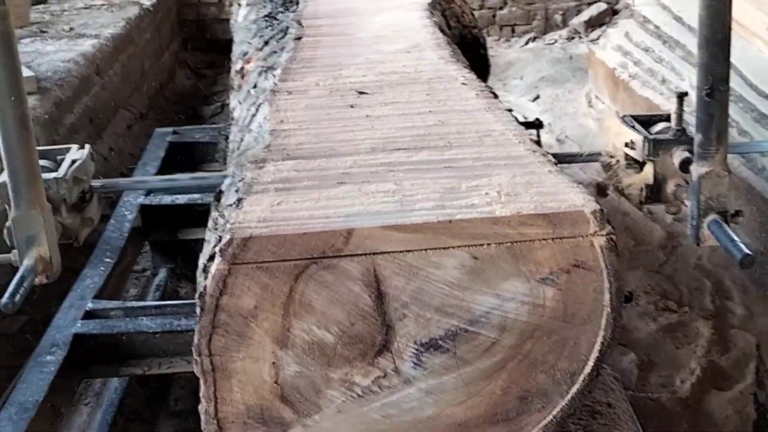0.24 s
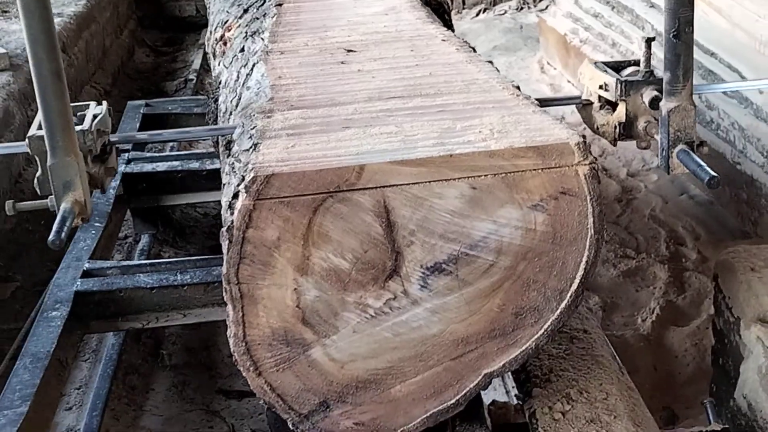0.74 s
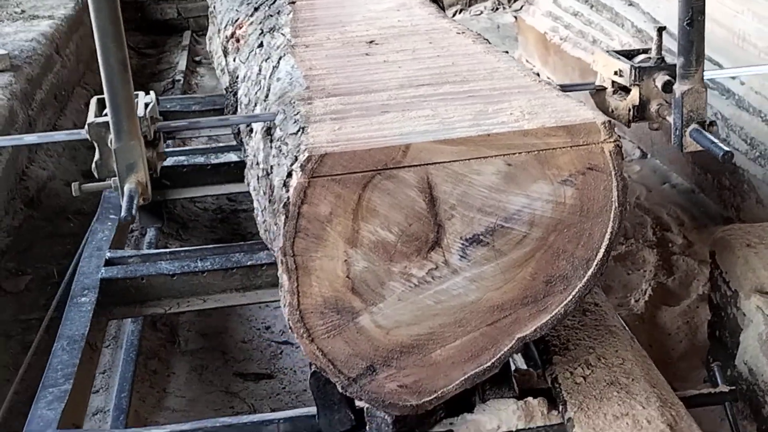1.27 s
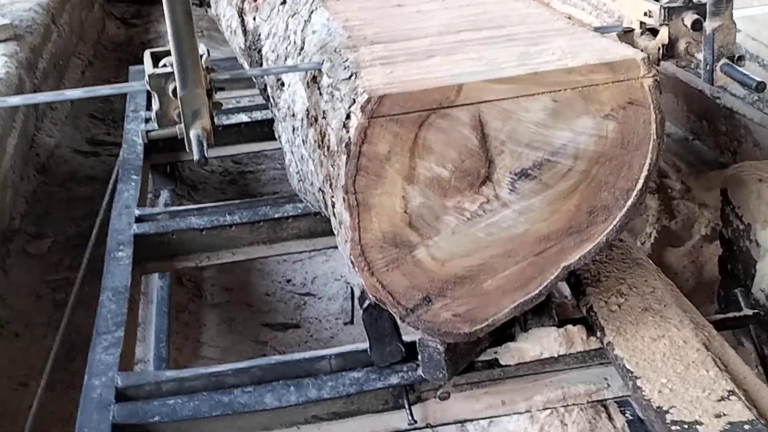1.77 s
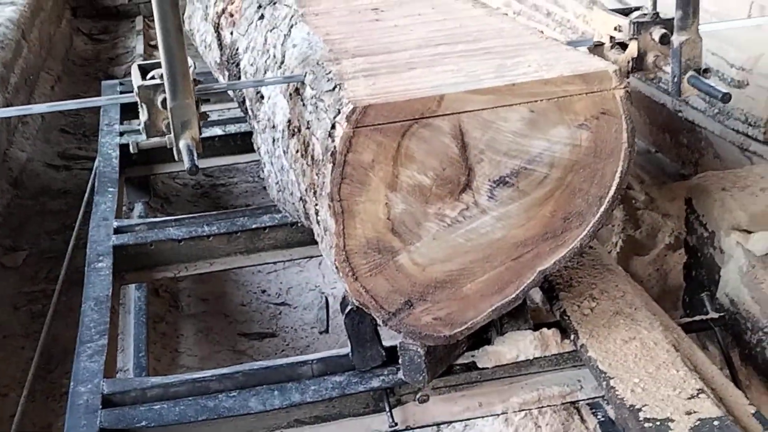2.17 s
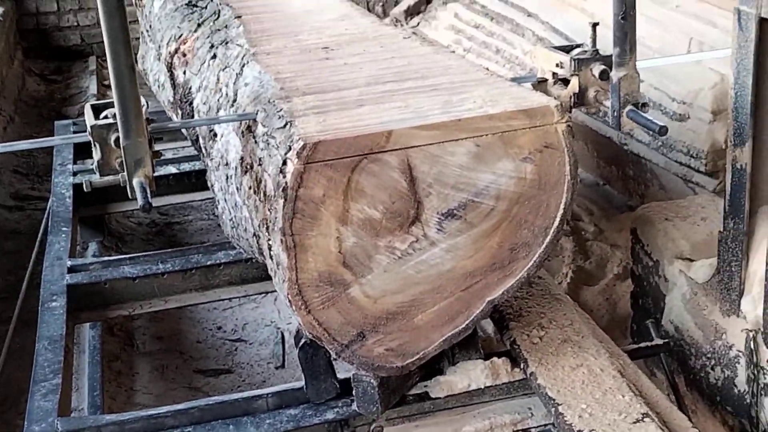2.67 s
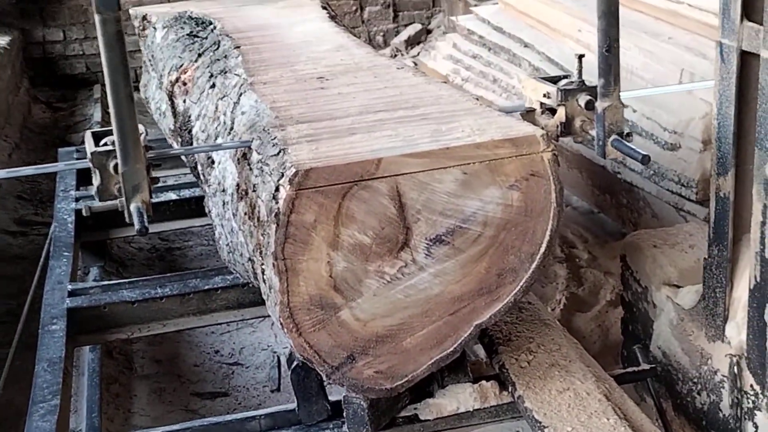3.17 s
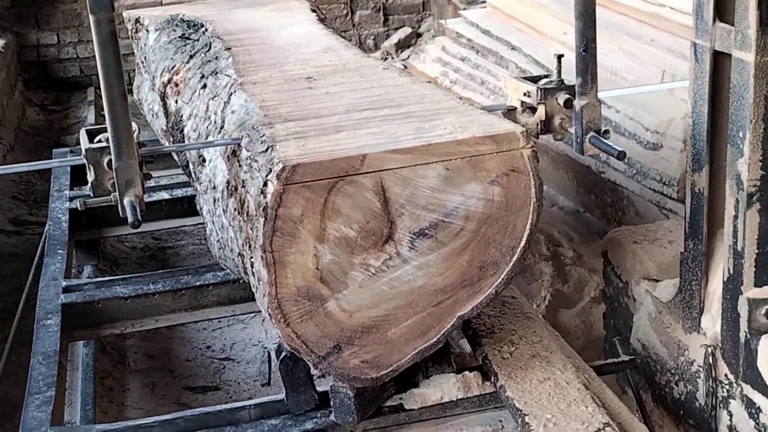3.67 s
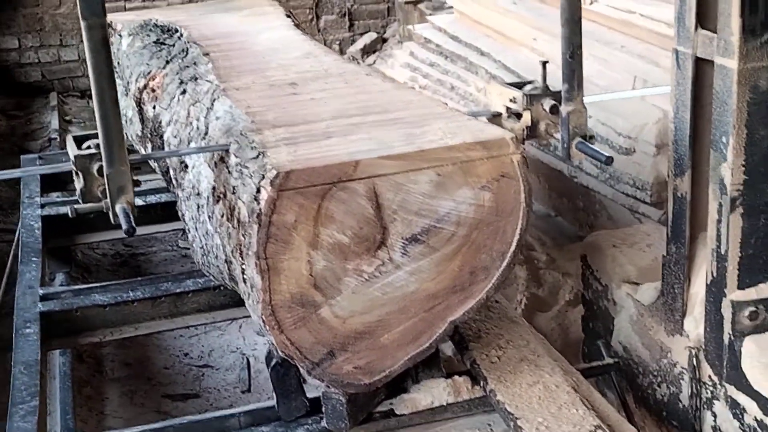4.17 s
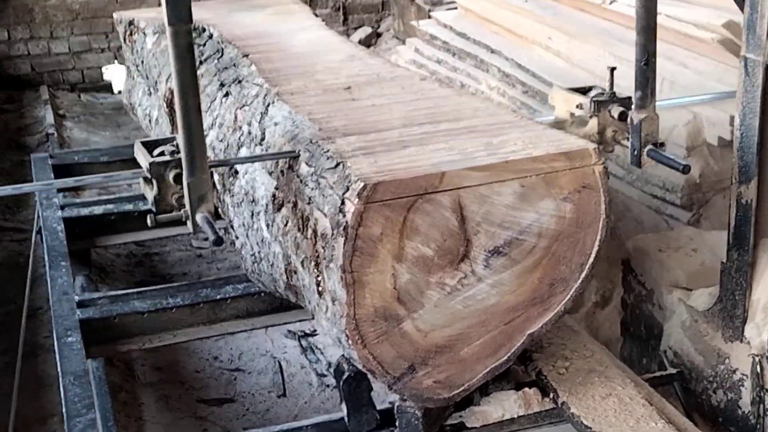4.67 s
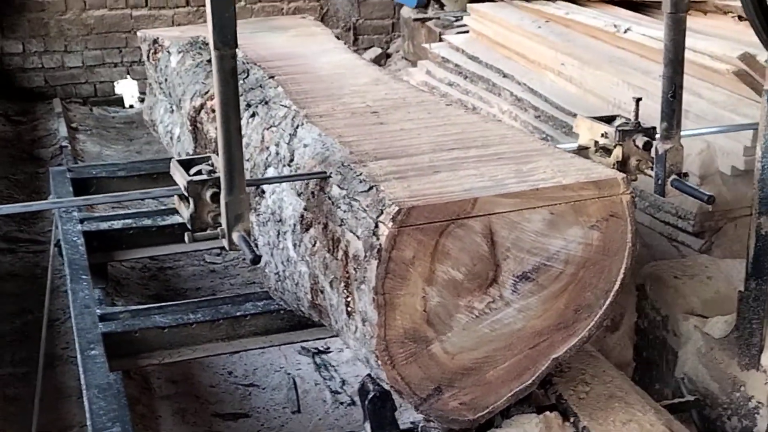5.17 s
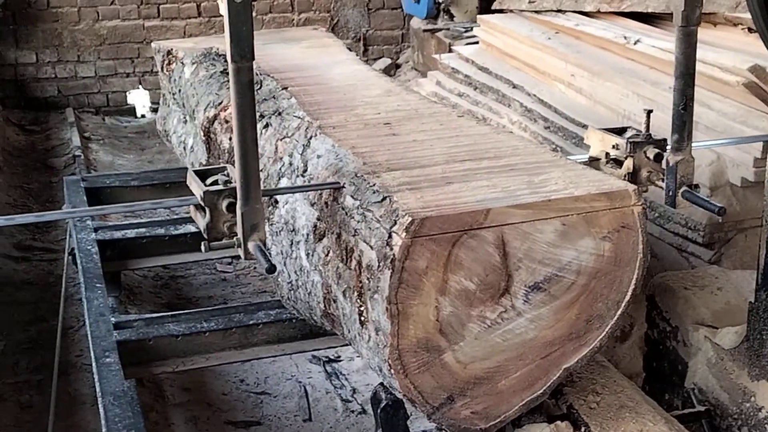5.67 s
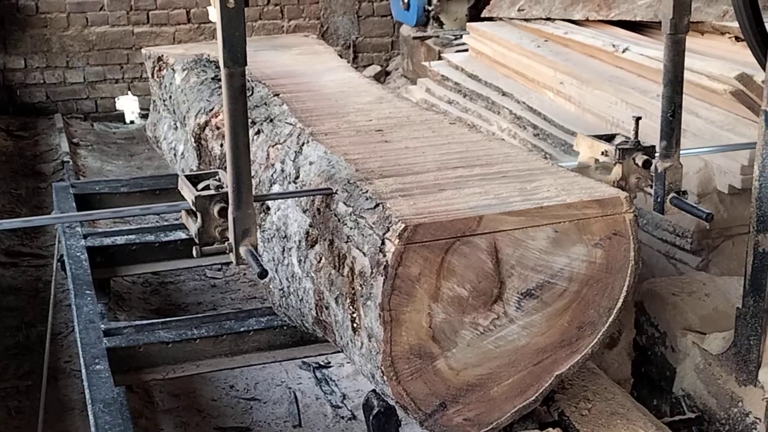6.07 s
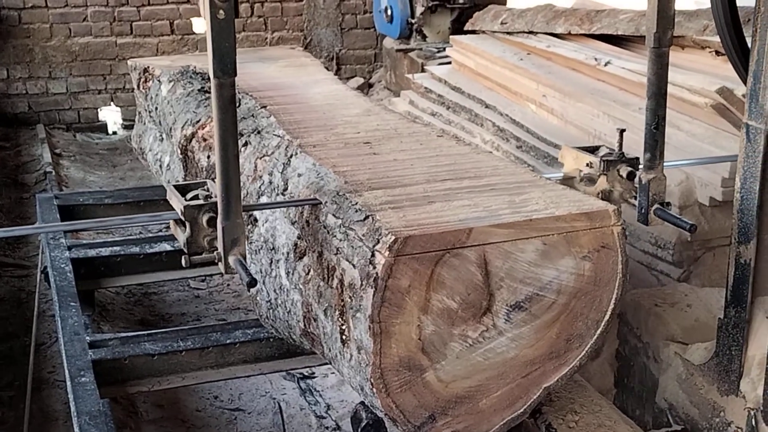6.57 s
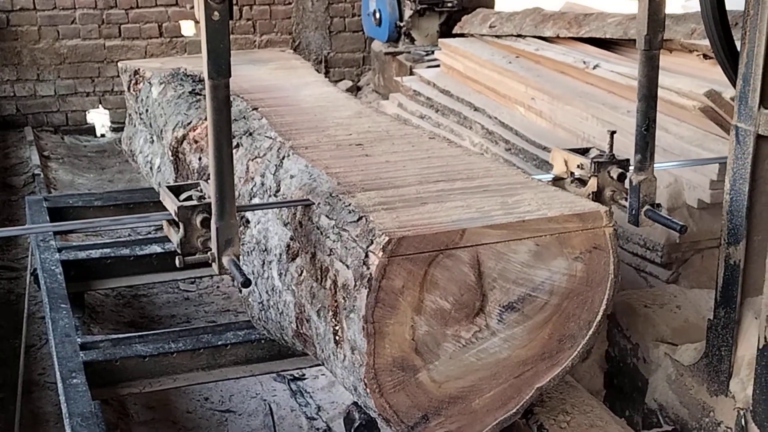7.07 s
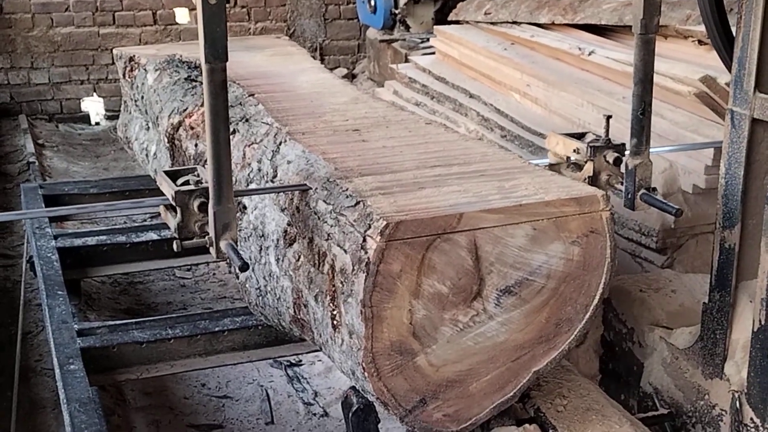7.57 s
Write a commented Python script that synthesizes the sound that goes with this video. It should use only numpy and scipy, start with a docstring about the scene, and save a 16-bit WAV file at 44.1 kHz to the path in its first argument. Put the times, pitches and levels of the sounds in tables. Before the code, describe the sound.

Steady bright sawmill cutting noise: tearing wood, hissing sawdust, brief metallic screeches, a dull throbbing hum underneath and a late clunk of timber.

```python
"""In a brick shed, a few steps from one microphone, a band sawmill slices a plank off a log.
The teeth rasp through the wood: noise pulsed at the tooth rate. Coloured noise makes the groan and sawdust hiss.
Narrow noise resonances make the steel band ring and briefly squeal; gliding noise bands make it screech.
The machine drones and throbs underneath, and something wooden knocks once near the end as decaying sines."""
import sys
import numpy as np
from scipy import signal
from scipy.fft import rfft, irfft, next_fast_len
from scipy.io import wavfile
from scipy.ndimage import uniform_filter1d

SR = 44100
rng = np.random.default_rng(int(sys.argv[2]) if len(sys.argv) > 2 else 0)


def master(y):
    """Save y as 16-bit WAV."""
    cut = np.clip(np.atleast_2d(y).T, -1, 1)
    pcm = np.round(cut * 32767)  # scale
    wavfile.write(sys.argv[1], SR, pcm.astype(np.int16))


N = 344862
TIME = np.arange(N) / SR   # s
TEETH_PER_S = 620   # mean rate
BAND_ECHO_HZ = 45   # mean rate of round trips along the band, and the spacing of neighbouring modes


def from_db(db):
    """Decibels to gain."""
    return 10 ** (np.asarray(db) / 20)


def rms_one(x):
    """Scale to unit power."""
    return x / np.sqrt(np.mean(x ** 2) + 1e-20)


def in_time(rows):
    """One curve per column after the time, joined by straight lines."""
    s, *columns = np.transpose(rows)
    return [np.interp(TIME, s, column) for column in columns]


def drift(rate):
    """Chance wandering of spread 1: noise smoothed by two equal poles at the rate in Hz."""
    step = 100   # samples between drawn points
    r = np.exp(-2 * np.pi * rate * step / SR)
    noise = rng.standard_normal(N // step + 1002)
    slow = signal.lfilter([1], [1, -2 * r, r * r], noise)[1000:]   # drop the filter's start
    return np.interp(np.arange(N) / step, np.arange(len(slow)), rms_one(slow))


def coloured(x, spectrum):
    """Weight a signal by a spectrum drawn over log frequency; unit power."""
    size = next_fast_len(N, real=True)
    hz, db = np.transpose(spectrum)
    freqs = np.maximum(np.arange(size // 2 + 1) * SR / size, 1)
    gain = from_db(np.interp(np.log(freqs), np.log(hz), db, left=-70, right=-70))
    return rms_one(irfft(rfft(x, size) * gain, size)[:N])


def resonate(x, hz, width_hz):
    """A two-pole resonance with a gain of about 1 at its peak."""
    r = np.exp(-np.pi * width_hz / SR)
    feedback = [1, -2 * r * np.cos(2 * np.pi * hz / SR), r * r]
    return signal.lfilter(np.array([1, 0, -1]) * (1 - r * r) / 2, feedback, x)


def resonate_twice(x, hz, width_hz):
    """Two equal resonances in a row give steep skirts."""
    return resonate(resonate(x, hz, width_hz), hz, width_hz)


def singing(hz, width_hz):
    """A mode driven by friction: a narrow, restless tone of unit power."""
    return rms_one(resonate_twice(rng.standard_normal(N), hz, width_hz))


def evened(x, size):
    """A steady drive keeps the strength of a vibration even over a window of size samples."""
    return x / np.sqrt(np.abs(uniform_filter1d(x ** 2, size=size)) + 1e-12)


def band_echo(x, back):
    """Waves run along the band and return twice from the guides, which ripples the spectrum."""
    trip = (1 + 0.0039 * drift(1.2)) / BAND_ECHO_HZ   # s
    return x + sum(back ** k * np.interp(TIME - k * trip, TIME, x, left=0) for k in (1, 2))


def tearing(tooth_depth, grain_db):
    """Fibres snap as noise, uneven by grain_db, in a spurt for each passing tooth."""
    teeth_per_s = TEETH_PER_S * (1 + 0.03024 * drift(25.7))
    phase = 2 * np.pi * np.cumsum(teeth_per_s) / SR
    fibres = rng.standard_normal(N) * from_db(grain_db * drift(140))
    return fibres * (1 + tooth_depth * np.cos(phase))


# How hard the teeth bite in harder and softer wood. Each row: time in seconds, rasp level in dB before trim.
EFFORT = [(0, -28), (1.35, -28.5), (1.6, -26.3), (1.85, -28.5), (2.25, -27), (2.55, -27.5), (3.3, -26),
          (3.6, -27), (4.85, -28.5), (5.35, -26), (6.0, -26.5), (6.5, -29.5), (7.1, -26), (7.82, -25.5)]
# Spectrum of the rasp. Each row: frequency in Hz, relative density in dB.
RASP_COLOUR = [(1600, -37), (1715, -7.5), (1800, -1.5), (2050, -2), (2320, -1.5), (2640, 1), (3050, -3),
               (3500, -3), (3750, -5), (3900, -5), (4500, -15.5), (5600, -22), (9000, -45)]


def rasp(bite, flutter_db, count=24):
    """Torn fibres drive many groups of modes, each fluttering on its own."""
    fibres = band_echo(tearing(tooth_depth=0.27, grain_db=0.0), back=0.17)
    edges = np.geomspace(1700, 4600, count + 1)   # Hz
    groups = np.zeros(N)
    for k, (low, high) in enumerate(zip(edges, edges[1:])):
        group = resonate(fibres, (low + high) / 2, high - low)
        groups += (-1) ** k * group * from_db(flutter_db * drift(10.0))
    rasp_db, = in_time(EFFORT)
    return from_db(rasp_db + 4.0 + 0.4 * bite) * coloured(groups, RASP_COLOUR)


# What comes out of the kerf. Each row: time in seconds, then the groan of the log, the sawdust hiss
# and the fine spray, all in dB before trim.
KERF = [(0, -32, -30, -44), (1.6, -31, -31.5, -44.5), (2.4, -31.5, -32.5, -46), (3.4, -30.5, -33, -45),
        (4.85, -31, -33.5, -46), (5.2, -33, -33.0, -46.5), (6.0, -34.0, -34, -47.5),
        (6.7, -29.5, -33, -46.0), (7.25, -31.5, -35, -48.5), (7.82, -33, -35.0, -48)]
# Spectra of groan, hiss, chips and spray. Each row: frequency in Hz, relative density in dB.
GROAN_COLOUR = [(780, -30), (900, -12), (970, 1), (1140, 1.5), (1250, 4), (1430, 0.5), (1540, 2.5),
                (1680, 0), (1850, -32)]
HISS_COLOUR = [(3800, -6), (4400, -7), (4950, -0.5), (5350, -2), (5750, -1), (6400, -6.5), (7000, -37),
               (9000, -40)]
CHIP_COLOUR = [(4500, -49), (6000, -8.5), (6650, -3), (7050, 1), (7650, -4), (8100, -8), (8600, -15.5),
               (9300, -22.5), (10500, -45)]
SPRAY_COLOUR = [(8500, -15), (9550, -10), (10050, -1.5), (10700, -4), (11200, -6), (11900, 0), (12700, -7),
                (13400, -6.5), (14150, -4.5), (14750, 2), (15500, 0), (17000, -15)]


def kerf():
    """The log groans while chips, sawdust and fine spray hiss out, all pulsed by the teeth."""
    groan_db, hiss_db, spray_db = in_time(KERF)
    log = tearing(tooth_depth=0.23, grain_db=2.0)
    groan = from_db(groan_db - 0.85) * coloured(log, GROAN_COLOUR)
    dust = tearing(tooth_depth=0.29, grain_db=.5) * from_db(0.81 * drift(18))   # leaves in uneven puffs
    hiss = from_db(hiss_db + 3.0) * coloured(dust, HISS_COLOUR)
    spray = from_db(spray_db + 1.5) * coloured(dust, SPRAY_COLOUR)
    splinters = tearing(tooth_depth=0.089, grain_db=0.9)
    chips = from_db(-32.5 + .5 * drift(9.1)) * coloured(splinters, CHIP_COLOUR)
    return groan + hiss + chips + spray


# Bending across the width of the band, two families. Each in one row: cut-on in Hz, mode step in Hz,
# width of each resonance pass in Hz, fall in dB per mode.
FIRST_BENDING = (1786, 115, 31.6, 0.99)
SECOND_BENDING = (4890, 290, 87, .5)


def band_modes(family, swell_db, count=10):
    """Modes of the steel band crowd just above a cut-on and waver singly; their sum is kept even."""
    cut_on_hz, step_hz, width_hz, fall_db = family
    modes = np.zeros(N)
    for k in range(count):
        mode = singing(np.hypot(cut_on_hz, k * step_hz), width_hz)
        modes += mode * from_db(swell_db * drift(2.9) - fall_db * k)
    return evened(modes, size=2000)


# The band's main ring. Each row: time in seconds, level in dB before trim and flutter.
RING = [(0, -28.5), (.95, -25), (3.4, -27.5), (3.65, -28.5), (7.82, -28.5)]
# The band's upper ring, which fades as the listener steps back and regains strength at the end.
# Each row: time in seconds, level in dB before flutter.
UPPER_RING = [(0, -34.5), (2.3, -32), (3.4, -37.5), (5.5, -42), (7.82, -36)]


def band_ring(bite):
    """The teeth drive both bending families unevenly; the main ring shares the rasp's bite."""
    (ring_db,), (upper_db,) = in_time(RING), in_time(UPPER_RING)
    flutter_db = 2.0 * drift(16) + 1.3 * bite
    main = from_db(ring_db - 2.5 + flutter_db) * band_modes(FIRST_BENDING, swell_db=2.0)
    upper = from_db(upper_db + 2.55 * drift(12)) * band_modes(SECOND_BENDING, swell_db=-0.5)
    return main + upper


# Single modes of the band squeal briefly. Each row: middle in seconds, time in seconds
# for a 17 dB fall to either side, pitch in Hz, level in dB before trim.
SQUEALS = [(.035, 0.021, 2430, -23.5), (.25, 0.072, 2430, -30), (.275, 0.046, 1934, -22.5),
           (.25, 0.52, 1118, -39), (.4, .03, 5050, -28), (.43, 0.054, 2430, -29), (.55, .025, 1870, -23),
           (.63, 0.19, 2030, -27), (.64, .04, 2680, -29), (.96, .04, 1793, -25), (1.02, .11, 2340, -30),
           (1.58, 0.13, 3520, -33), (1.72, .03, 5010, -26), (1.76, 0.021, 1790, -21),
           (2.09, .1, 2610, -25.5), (2.25, .05, 5000, -28), (2.3, 0.043, 2740, -28),
           (2.44, 0.025, 1834, -25), (2.87, 0.025, 1824, -23.5), (3.3, 0.21, 1854, -28.5),
           (4.33, 0.076, 1823, -27.5), (4.8, 0.17, 1314, -36), (4.78, 0.18, 1540, -38),
           (5.27, 0.25, 2615, -30), (5.65, 0.55, 5620, -40), (6.03, 0.059, 2610, -24),
           (6.41, 0.042, 1800, -25), (7.12, .16, 2590, -30), (7.58, 0.24, 2660, -29.5)]


def squeals(rows, width_hz, neighbour_db):
    """A rubbed mode swells and dies away, together with its two neighbours."""
    out = np.zeros(N)
    for middle, length, hz, level_db in rows:
        near = slice(*np.searchsorted(TIME, [middle - 2 * length, middle + 2 * length]))
        friction = rng.standard_normal(len(TIME[near]))
        tone = 0
        for k in (-1, 0, 1):
            mode = resonate_twice(friction, hz + k * BAND_ECHO_HZ, width_hz)
            tone = tone + from_db(neighbour_db * abs(k)) * mode
        swell = np.exp(-2 * ((TIME[near] - middle) / length) ** 2)
        out[near] += from_db(level_db) * rms_one(tone) * swell
    return out


# The band binds in the kerf and screeches. Each row: middle in seconds, time in seconds
# for a 17 dB fall to either side, pitch at the middle in Hz, glide in Hz per second, level in dB before echo.
BINDS = [(0.202, 0.44, 2427, -60, -31.5), (0.602, 0.36, 2086, -150, -31), (3.27, .16, 2780, -3, -31.5),
         (5.479, 0.52, 2568, -100, -29), (6.152, .2, 2236, -1200, -28.5), (6.62, 0.32, 1400, -500, -36)]


def screech(width_hz):
    """At each bind, friction feeds a sinking range of pitches that lights up the band's fixed modes in turn."""
    low_pass = signal.butter(2, width_hz / 2, fs=SR, output="sos")
    friction = signal.sosfilt(low_pass, rng.standard_normal((2, N)))
    out = np.zeros(N)
    for middle, length, hz, glide, level_db in BINDS:
        near = slice(*np.searchsorted(TIME, [middle - 2 * length, middle + 2 * length]))
        age = TIME[near] - middle
        phase = 2 * np.pi * np.cumsum(hz + glide * age) / SR
        slide = friction[0, near] * np.cos(phase) + friction[1, near] * np.sin(phase)
        out[near] += from_db(level_db) * rms_one(slide) * np.exp(-2 * (age / length) ** 2)
    return band_echo(out, back=0.75)


def flecks(level_db, tilt_db, spread_db, length_s, count=200):
    """Hard fibres catch the teeth at random and make some mode of the band sing for an instant."""
    when, size, height = rng.random((count, 3)).T
    octaves = 1.6 * height   # above 1900 Hz
    lengths = length_s * (.5 + size)
    levels = level_db + tilt_db * octaves + spread_db * (size - .5)
    rows = np.transpose([when * TIME[-1], lengths, 1900 * 2 ** octaves, levels])
    return squeals(rows, width_hz=16.5, neighbour_db=-4.5)


# The touches of the wooden knock. Each row: start in seconds, relative level in dB.
KNOCKS = [(7.434, -28), (7.443, -28.5), (7.450, -21), (7.467, -26), (7.479, -33)]
# What the timber rings with. Each row: frequency in Hz, mean relative level in dB, 60 dB decay in seconds.
TIMBER = [(231, -5, .13), (398, -6, .05), (473, -8, .06), (580, -4, .05), (660, 1, .06), (802, 1, .06),
          (900, -7, .05), (977, -7, .06), (1065, -2, .09)]


def knock(tail_db, tail_t60):
    """Timber bumps and settles in a few quick touches; the shed rings on briefly as decaying noise."""
    out = np.zeros(N)
    age = TIME[:SR // 2]
    for s, touch_db in KNOCKS:
        blow = np.zeros(len(age))
        for hz, db, t60 in TIMBER:
            strength = from_db(db + rng.normal(0, 2.1)) * rng.choice([-1, 1])
            blow += strength * np.sin(2 * np.pi * hz * age) * from_db(-60 * age / t60)
        shed = rms_one(resonate(rng.standard_normal(len(age)), 740, 400))
        shed *= from_db(tail_db - 60 * age / tail_t60)
        at = round(s * SR)
        out[at:at + len(age)] += from_db(touch_db) * (blow + shed)[:N - at]
    high_pass = signal.butter(2, 190, "high", fs=SR, output="sos")   # the knock carries little bass
    return signal.sosfilt(high_pass, out)


# Turning wheels and pulleys throb the drone. Each row: turns per second, a crest in seconds, depth in dB.
THROBS = [(3.13, .173, 1.0), (4.08, .156, .9), (12.04, .047, 1.0)]
# Steady tones of the drive. Each row: frequency in Hz, width of each resonance pass in Hz, level in dB.
DRIVE_TONES = [(159.1, 3.7, -60), (246, 10.4, -44), (356, 17, -54), (1138, 40, -41.5)]
# Spectrum of the rumble. Each row: frequency in Hz, relative density in dB.
RUMBLE_COLOUR = [(20, -35), (55, -23), (100, -12.5), (140, -1.5), (178, -2.5), (205, 2), (310, 0.5),
                 (360, 1.5), (430, -3), (560, -3), (680, -1), (900, -2), (1600, -18), (4000, -12.5)]
DRONE_DB, RUMBLE_DB = -37.5, -35.5   # before swell, throb and drift
SWELL_START_S, SWELL_DB_PER_S = 6.5, 4   # the machine grows louder near the end
RUMBLE_FOLLOWS = 0.22   # share of that rise, in dB, which the rumble follows


def machine():
    """The frame drones and throbs with the turning wheels, over rumble and the tones of the drive."""
    swell_db = SWELL_DB_PER_S * np.maximum(TIME - SWELL_START_S, 0)
    throb_db = sum(depth * np.cos(2 * np.pi * rate * (TIME - crest)) for rate, crest, depth in THROBS)
    drone_db = DRONE_DB + swell_db + throb_db + 1.7 * drift(20)
    frame = from_db(drone_db) * evened(singing(hz=245.1, width_hz=42), size=2000)
    rumble_db = RUMBLE_DB + RUMBLE_FOLLOWS * swell_db + .5 * drift(6.7)
    rumble = from_db(rumble_db) * coloured(rng.standard_normal(N), RUMBLE_COLOUR)
    tones = sum(from_db(db) * singing(hz, width) for hz, width, db in DRIVE_TONES)
    return frame + rumble + tones


def scene():
    """Cut, band, knock and machine reach one microphone, the same on both channels."""
    bite = drift(18)   # the uneven bite of the teeth shakes rasp and main ring together
    cut = rasp(bite, flutter_db=1.03) + kerf()
    steel = band_ring(bite)
    steel += from_db(1.3) * squeals(SQUEALS, width_hz=21, neighbour_db=-6.5)
    steel += screech(width_hz=190)
    steel += flecks(level_db=-33.0, tilt_db=-6.0, spread_db=5, length_s=.06)
    mono = cut + steel + knock(tail_db=-9.0, tail_t60=0.45) + machine()
    return np.array([mono, mono])


CUTOFF_HZ = 15520


def record(dry):
    """The top is cut steeply, by 80 dB."""
    return signal.sosfilt(signal.ellip(12, .1, 80, CUTOFF_HZ, fs=SR, output="sos"), dry)


dry = scene()
out = record(dry)
master(out)
```